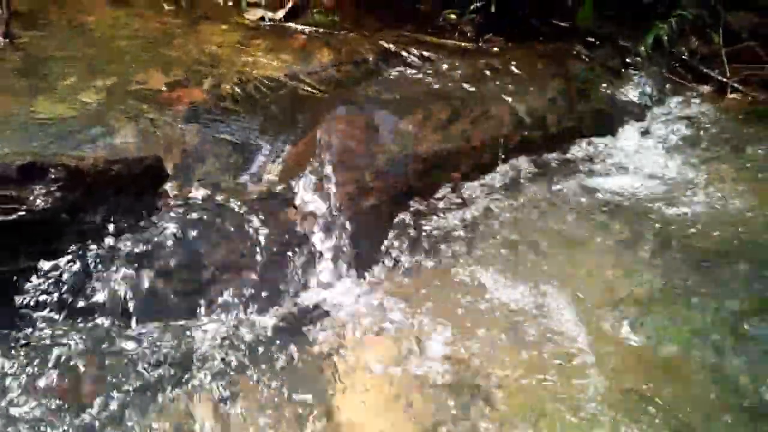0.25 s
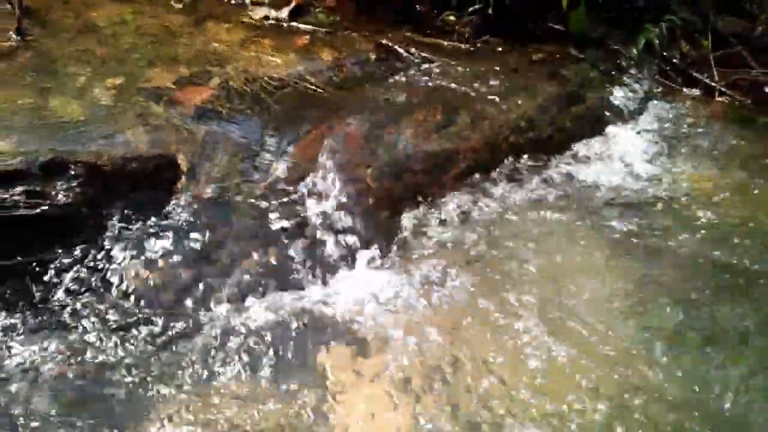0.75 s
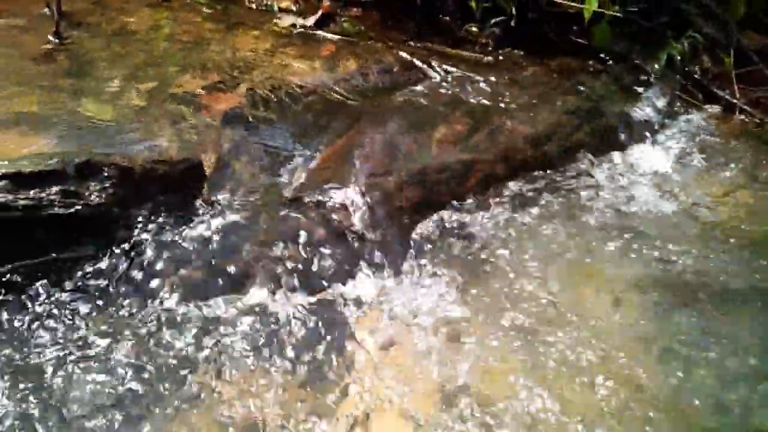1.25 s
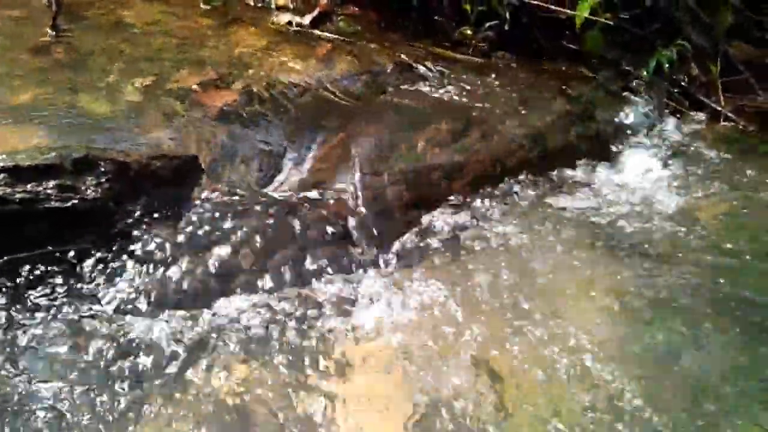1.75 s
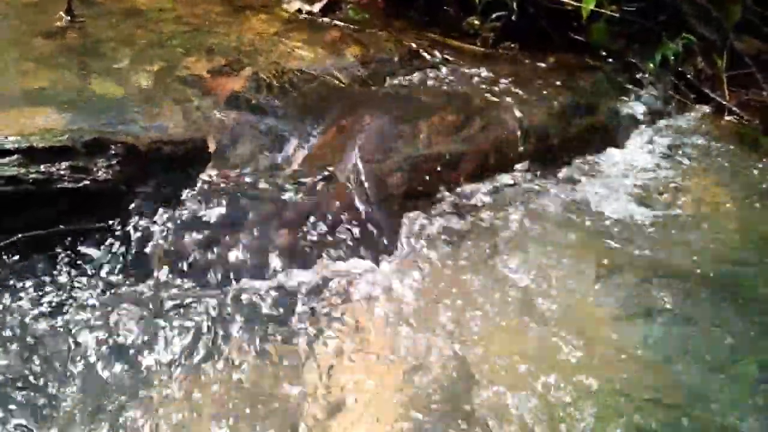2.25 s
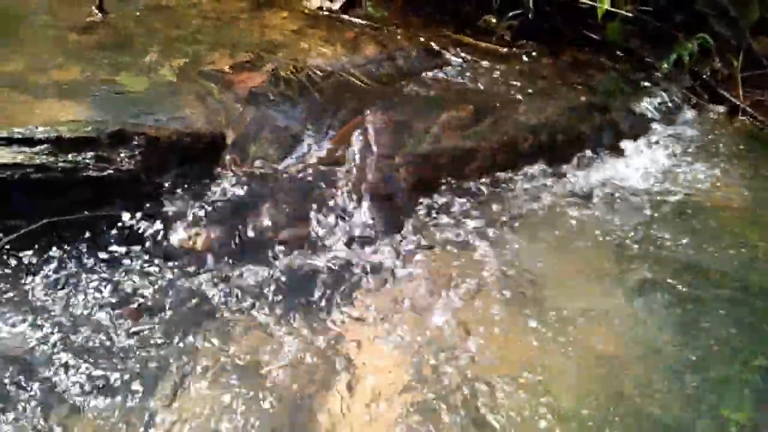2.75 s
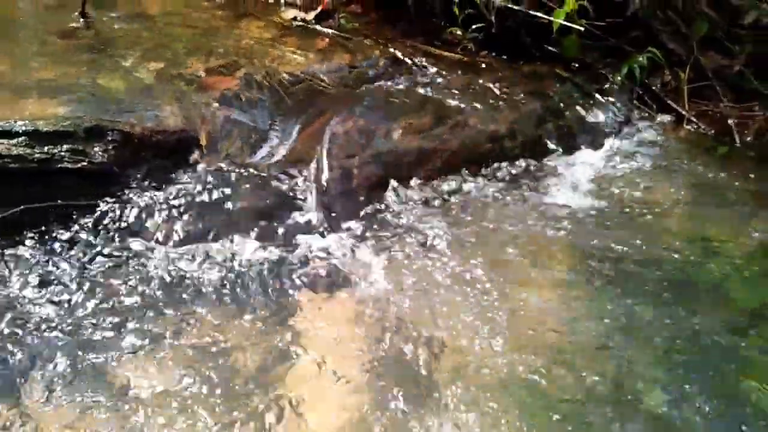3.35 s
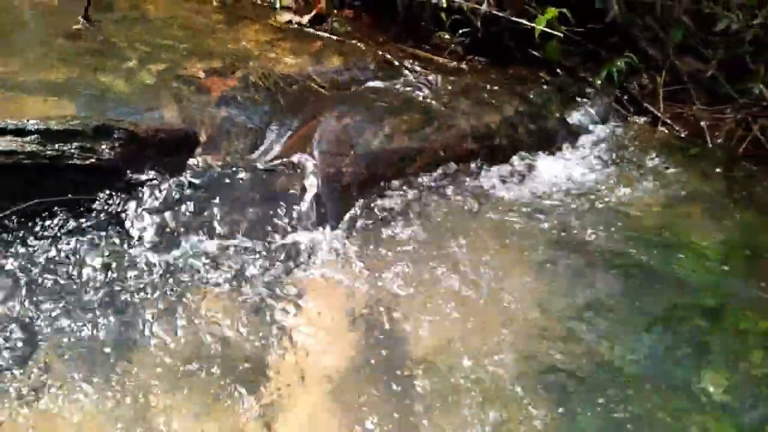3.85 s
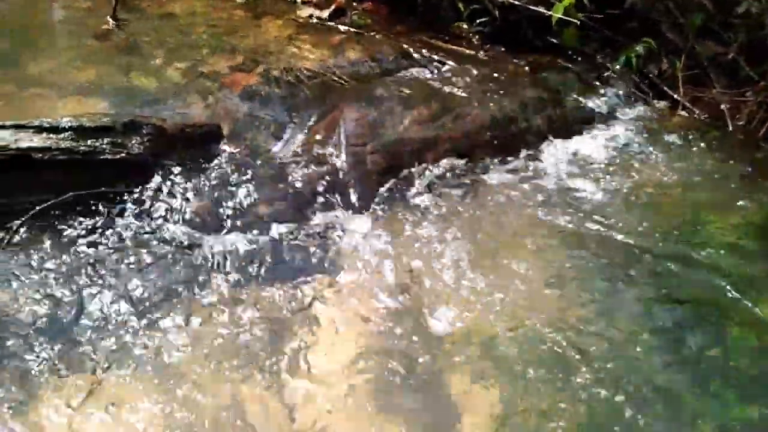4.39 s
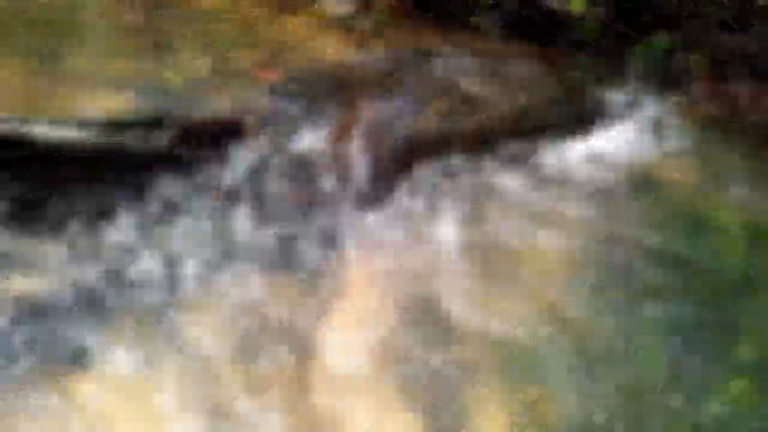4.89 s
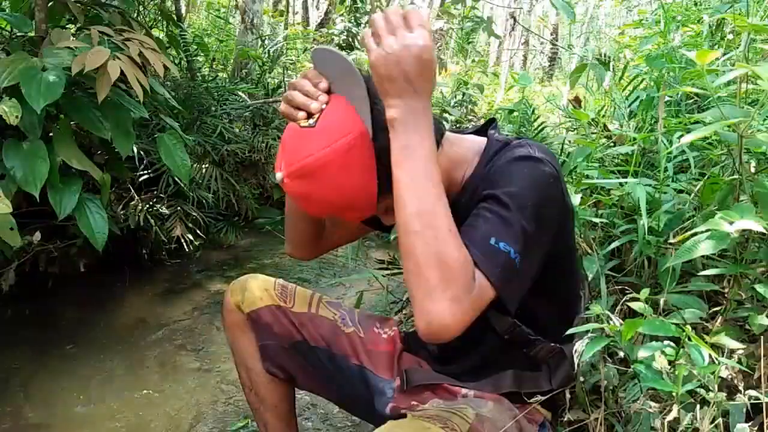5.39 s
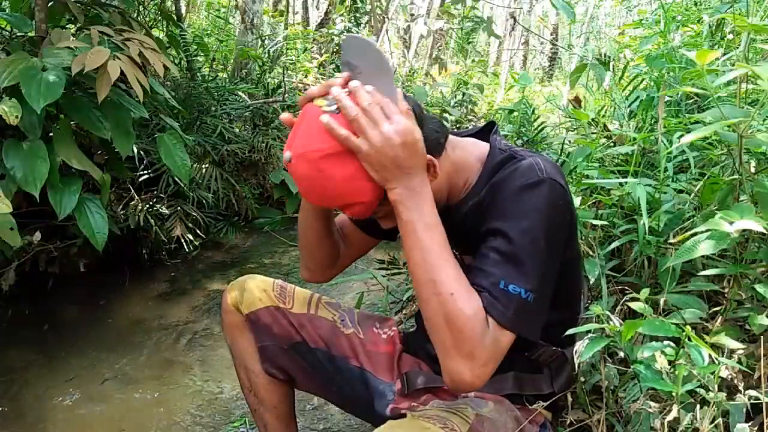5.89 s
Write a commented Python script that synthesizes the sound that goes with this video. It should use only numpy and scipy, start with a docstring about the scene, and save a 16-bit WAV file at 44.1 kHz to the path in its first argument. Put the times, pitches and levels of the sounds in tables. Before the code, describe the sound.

A small stream rushes and babbles loudly over a rock ledge, plopping and fizzing, then cuts abruptly to a quiet bank with thin shrilling insects.

```python
"""A rock ledge in a forest stream, heard close by on a hand-held microphone, then a quiet bank.
At the ledge, trapped air rings as plops and dense babble, a hollow below gurgles, foam fizzes,
spray patters and spits, and soft knocks reach the microphone's case; rocks return a short echo.
At the bank, insects shrill, slow water trickles and drips, wet hands rustle on a cap, birds whistle far off.
Bubbles, knocks and whistles are enveloped sines, other textures mostly shaped noise or bubble clouds."""
import sys
import numpy as np
from scipy import signal
from scipy.fft import rfft, irfft, next_fast_len
from scipy.io import wavfile
from scipy.ndimage import uniform_filter1d

SR = 44100
rng = np.random.default_rng(int(sys.argv[2]) if len(sys.argv) > 2 else 0)


def to_wav(sig):
    """Store sig (one row per channel, or 1-D mono) as 16-bit WAV at the path in sys.argv[1].

    Samples outside -1..1 are clipped; the rate is SR.
    """
    pcm = np.clip(np.atleast_2d(sig), -1, 1) * 32767
    pcm = np.round(pcm).astype(np.int16)
    wavfile.write(sys.argv[1], SR, pcm.T)  # frames by channels


N = 270333
TIME = np.arange(N) / SR   # [s]
SCENE_CHANGE_S = 4.584
CUTOFF_HZ = 14250

# Air dragged under by the fall; babble and gurgle each offset it: (time [s], level [dB])
CHURN_LEVEL = [(0, -47.5), (.3, -46.5), (1.0, -47), (1.4, -51.5), (1.7, -47), (1.9, -52), (2.05, -45),
               (2.22, -53), (2.45, -47.5), (3.0, -45), (3.55, -51.5), (3.7, -43.5), (3.82, -48),
               (4.55, -50)]
# Surges into the hollow under the ledge: (time [s], rms level at the top [dB], swell time [s])
HOLLOW_SURGES = [(.17, -56.5, 0.071), (.279, -50.5, 0.021), (0.523, -49, 0.022), (0.703, -51.5, 0.021),
                 (.81, -56.5, 0.026), (.89, -55.5, 0.033), (.965, -59, 0.026), (1.545, -57, 0.013),
                 (2.283, -56.5, .017), (2.36, -57.5, 0.034), (2.49, -58.5, 0.017), (2.68, -58, 0.026),
                 (2.825, -61, 0.012), (3.515, -61.5, 0.032), (3.68, -63.5, 0.071), (3.969, -60.5, 0.021),
                 (4.546, -60.5, 0.021)]
# Resonances of the air pockets under the ledge: (frequency [Hz], width [Hz], relative level [dB])
HOLLOW_RESONANCES = [(250.6, 33, -7.5), (298, 46, -4)]
# Small waves breaking into foam, before the fizz trim: (time [s], level at the top [dB])
BREAKERS = [(0.383, -55.5), (0.577, -53.5), (.738, -57.5), (1.055, -52), (1.226, -53), (1.478, -60),
            (1.77, -58), (2.37, -54.5), (2.512, -56.5), (2.81, -53.5), (3.2, -58.5), (3.59, -53.5),
            (4.17, -56.5)]
# Tongues of water slapping down: (time [s], rms level at the top [dB], swell time [s])
SPLASHES = [(.002, -53, 0.015), (.152, -56.5, 0.012), (.338, -57, 0.02), (0.467, -43.5, 0.012),
            (0.611, -51, 0.011), (1.066, -35.5, 0.0025), (1.553, -57, 0.0044), (1.784, -46.5, 0.0072),
            (1.962, -51, 0.0062), (2.172, -64, 0.019), (2.385, -68, .03), (2.825, -56, 0.012),
            (3.469, -54.5, 0.011), (3.646, -51, 0.0068), (3.695, -59, 0.019), (4.045, -61, .011),
            (4.205, -60.5, 0.013), (4.355, -54, 0.0052), (4.411, -56, 0.016)]
# Large air pockets pinching off: (time [s], pitch [Hz], peak level [dB], swell time [s])
PLOPS = [(.016, 790, -33, 0.0012), (.091, 672, -35, 0.0021), (.241, 1183, -31, 0.004),
         (0.264, 1205, -35, 0.0033), (.29, 700, -34.5, 0.0017), (0.315, 1065, -36.5, 0.0037),
         (0.412, 1990, -38.5, 0.0016), (.471, 1365, -33.5, 0.0018), (0.484, 1820, -35.5, 0.0031),
         (.558, 1890, -34, 0.0038), (0.622, 1250, -34, 0.0038), (0.631, 2130, -33.5, 0.0012),
         (0.713, 1345, -33.5, 0.0015), (0.806, 1294, -33, 0.0025), (.835, 1350, -37.5, 0.0056),
         (0.98, 1048, -37, 0.0063), (1.063, 1280, -42, 0.0027), (1.082, 940, -35.5, 0.0016),
         (1.125, 2100, -36, 0.0027), (1.26, 739, -31.5, 0.0074), (1.289, 1200, -39, 0.0044),
         (1.318, 1010, -33, 0.0018), (1.453, 1870, -40.5, 0.0038), (1.464, 883, -36, 0.0067),
         (1.493, 1403, -36.5, 0.0034), (1.635, 979, -36.5, 0.0052), (1.658, 675, -40.5, 0.0068),
         (1.691, 702, -34, 0.0025), (1.706, 930, -35.5, 0.0034), (1.784, 895, -30, 0.0023),
         (1.791, 2020, -30.5, 0.0015), (1.875, 1850, -37, 0.0027), (2.028, 840, -41.5, 0.004),
         (2.268, 1100, -36, 0.0043), (2.274, 1850, -33, 0.004), (2.292, 1550, -32.5, 0.0016),
         (2.472, 740, -35.5, 0.007), (2.543, 585, -33.5, 0.0084), (2.68, 1293, -40.5, 0.0046),
         (2.739, 1210, -40, 0.0022), (2.834, 1260, -24.5, 0.0024), (2.95, 1270, -34.5, 0.0012),
         (2.954, 597, -38.5, 0.006), (3.027, 2120, -35, 0.0018), (3.044, 1226, -33, 0.0051),
         (3.143, 1750, -37.5, 0.0024), (3.16, 1018, -37, 0.0043), (3.26, 673, -41, .005),
         (3.363, 1387, -35.5, 0.0039), (3.425, 1153, -36.5, 0.0026), (3.472, 1800, -38.5, 0.0025),
         (3.582, 1205, -37.5, 0.0036), (3.691, 1190, -34.5, 0.0076), (3.705, 780, -40.5, 0.0052),
         (3.853, 657, -43.5, 0.0079), (3.925, 1900, -38, 0.0021), (3.97, 1120, -36, 0.0019),
         (4.053, 1470, -37.5, 0.0025), (4.087, 1507, -41, 0.0066), (4.15, 730, -42, .004),
         (4.239, 1880, -34.5, 0.0016), (4.302, 1470, -37.5, 0.0041), (4.392, 916, -38, 0.0044),
         (4.416, 2610, -38, 0.0025), (4.487, 970, -34, 0.0039)]
# Soft knocks on the microphone's case: (time [s], peak level [dB])
KNOCKS = [(.028, -54), (.116, -55), (1.468, -60), (2.506, -50), (2.582, -53), (2.66, -53), (2.962, -52),
          (3.242, -53), (3.33, -54), (3.434, -54), (3.651, -55)]
# Crests flinging fine spray: (time [s], rms level at the top [dB])
SPRAYS = [(.165, -51), (.485, -47), (.938, -51), (1.28, -47), (1.512, -47), (3.022, -48), (3.09, -55),
          (3.216, -49)]
# Single droplets each ringing a tiny bubble: (time [s], pitch [Hz], peak level [dB])
PLINKS = [(0.526, 4200, -41), (0.836, 5200, -38), (1.065, 4300, -30), (1.216, 3200, -42.5),
          (1.233, 6420, -43), (1.939, 2630, -41), (2.188, 6373, -41.5), (3.603, 3010, -39)]
# Drops snapping on the surface: (time [s], pitch [Hz], peak level of the ring [dB])
SPITS = [(1.0673, 8950, -22), (1.2987, 9170, -33), (2.5558, 9300, -33), (2.576, 9300, -21),
         (2.8308, 8000, -24), (2.8429, 8750, -26), (3.6086, 7640, -26), (4.1549, 11100, -25),
         (4.1854, 8030, -28)]
# The insect chorus swelling and sinking: (time [s], level [dB])
INSECT_LEVEL = [(4.6, -58.5), (5.15, -60), (5.22, -62), (5.27, -58.5), (5.7, -63.5), (5.85, -60),
                (6.12, -62)]
# The slow water by the bank: (time [s], level [dB])
TRICKLE_LEVEL = [(4.6, -88), (4.85, -81), (5.25, -83), (5.6, -80.5)]
# Hands on the cap, before a shared lift: (time [s], level [dB], swell time [s])
RUSTLES = [(4.72, -86, 0.14), (4.86, -86, 0.008)]
# Water dripping into the pool: (time [s], pitch [Hz], peak level [dB], swell time [s])
DRIPS = [(4.868, 2290, -65, 0.0039), (4.973, 1730, -71, .004), (5.03, 2000, -71.5, .005),
         (5.9, 1010, -70, 0.0081), (5.985, 1900, -73, .005), (6.105, 890, -70, 0.01)]
# Birds far off: (time [s], pitch [Hz], peak level [dB], length [s])
WHISTLES = [(5.44, 1360, -79.5, 0.13), (5.567, 3410, -79, 0.029)]

# Colour of the babble: (frequency [Hz], relative level [dB])
BABBLE_COLOUR = [(375, -47.5), (425, -0.5), (470, -1.5), (515, -5.5), (585, 5.5), (660, -3), (745, 5),
                 (830, 0.5), (1150, 1), (1500, -3), (1900, -4), (2350, -12), (2750, -10), (3400, -18.5),
                 (7000, -40)]
# Colour of the foam fizz: (frequency [Hz], relative level [dB])
FIZZ_COLOUR = [(1800, -12), (3400, -30.5), (6300, -18), (6900, -11), (7400, -2.5), (7900, -2), (8500, -8.5),
               (9200, -9.5), (10500, -14), (14300, -18)]
# Colour of the insects' shrilling: (frequency [Hz], relative level [dB])
INSECT_COLOUR = [(6000, -56), (6600, -11), (7000, -3), (7300, 6), (7550, 7), (7900, 1), (8400, -8.5),
                 (9500, -16), (11000, -37), (14000, -25)]
# Colour of the forest background: (frequency [Hz], relative level [dB])
AIR_COLOUR = [(20, -6), (110, -4), (180, -13.5), (400, -12), (1000, -15), (5000, -21), (9000, -13),
              (12500, -22), (14300, -9.5)]
# Colours of the other textures: (frequency [Hz], relative level [dB])
SPLASH_COLOUR = [(2500, -0.5), (4200, 5.5), (6500, -1.0), (12000, -51)]
SPRAY_COLOUR = [(6000, -21), (9000, 4), (14000, -9)]
DROPLET_COLOUR = [(5800, -6.0), (7600, 37), (9300, 32.0), (14000, 20.0)]
TRICKLE_COLOUR = [(450, -10.0), (1000, -2.5), (2000, -10.5), (4000, -25.0)]
CLOTH_COLOUR = [(300, -15.0), (2000, 4.0), (5000, -4.5), (9000, 8), (14000, 4.0)]
# Left-right likeness of water and cloth: (frequency [Hz], likeness [0 to 1])
WATER_LIKENESS = [(6000, 1), (7500, 0.82), (9000, 0.5)]
# Left-right likeness of insects and background: (frequency [Hz], likeness [0 to 1])
BANK_LIKENESS = [(7500, 1), (14000, 0.38)]


def from_db(db):
    """Decibels to amplitude."""
    return 10 ** (np.asarray(db) / 20)


def rms_one(x):
    """Scale to rms 1."""
    return x / np.sqrt(np.mean(x ** 2) + 1e-20)


def in_time(rows):
    """A (time, level) curve read at every sample."""
    seconds, levels = np.transpose(rows)
    return np.interp(TIME, seconds, levels)


def at_hz(points, hz):
    """A spectrum read on a log-frequency axis."""
    frequencies, values = np.transpose(points)
    return np.interp(np.log(hz + 1), np.log(frequencies), values)


def filtered(x, gain):
    """Filter by a gain that is a function of frequency."""
    size = next_fast_len(N + 8192)   # padding keeps the end from wrapping onto the start
    hz = np.arange(size // 2 + 1) * SR / size
    return irfft(rfft(x, size) * gain(hz), size)[..., :N]


def coloured(x, spectrum):
    """Give a signal a spectrum and scale it to rms 1."""
    return rms_one(filtered(x, lambda hz: from_db(at_hz(spectrum, hz))))


def stereo(pair, likeness):
    """Two unrelated signals become left and right, as alike at each frequency as the table says."""
    def width(hz):
        alike = np.clip(at_hz(likeness, hz), 0, 1)
        return np.sqrt((1 - alike) / (1 + alike))
    middle, side = pair[0], filtered(pair[1], width)
    return middle + side * np.array([[1], [-1]])


def drift(rate_hz):
    """Random wandering with rms 1, mostly slower than the rate."""
    return rms_one(filtered(rng.standard_normal(N), lambda hz: 1 / (1 + (hz / rate_hz) ** 4)))


def add(track, when, sound):
    """Mix a sound into a track from a time [s] on."""
    start = int(np.clip(round(when * SR), 0, N))
    track[start:start + len(sound)] += sound[:N - start]


def swell(t, rise):
    """An envelope that rises to 1 after the rise time [s], then dies away."""
    age = np.maximum(t, 0) / rise
    return age ** 2 * np.exp(2 - 2 * age)


def evened(x, window_s):
    """Hold the slow level of a texture steady and keep its grain."""
    return x / np.sqrt(uniform_filter1d(x ** 2, int(window_s * SR)) + 1e-9)


def bubble(hz, rise, glide):
    """An air pocket pinches off and rings; its pitch climbs, where it glides, as it nears the surface."""
    t = np.arange(int(6 * rise * SR)) / SR
    pitch = hz * (1 + glide * (t / rise - 1))   # glide: fraction of the pitch per rise time
    cycles = np.cumsum(pitch) / SR + rng.random()
    return swell(t, rise) * np.sin(2 * np.pi * cycles)


def bubble_cloud(count, low_hz, high_hz, rise_s, spread_db):
    """Bubbles of all sizes at random times, few strong; small ones ring briefly and hardly glide."""
    out = np.zeros(N)
    for when, size, luck, damping, climb in rng.random((count, 5)):
        hz = low_hz * (high_hz / low_hz) ** size
        rise_spread = 2 ** (2 * damping - 1)
        rise = rise_s * (1000 / hz) ** (2 / 3) * rise_spread   # rise_s holds at 1 kHz
        strength = (hz / low_hz) ** (5 / 6) * from_db(-spread_db * np.log(luck + .03))
        add(out, when * N / SR, strength * bubble(hz, rise, glide=climb ** 2 * 25 / hz))
    return rms_one(out)


def ring_bubbles(rows, glide=0.0027):
    """Single bubbles, each with its own time, pitch, peak level and swell time."""
    out = np.zeros(N)
    for when, hz, db, rise in rows:
        add(out, when, from_db(db) * bubble(hz, rise, glide))
    return out


def among_rocks(x, echo_db=-9.5, t60_s=0.18):
    """The ledge and the banks scatter a short diffuse echo: decaying noise, silent for 3 ms."""
    t = TIME[:SR // 5]
    echo = rng.standard_normal(len(t)) * from_db(-60 * t / t60_s) * (t > .003)
    echo /= np.linalg.norm(echo)
    return x + from_db(echo_db) * signal.fftconvolve(x, echo)[:N]


def babble(clump_db=2.2, trim_db=-2.7, wash_db=-3.0):
    """Countless smaller bubbles come in clumps over the noisy wash of the fall."""
    cloud = bubble_cloud(count=5500, low_hz=400, high_hz=5200, rise_s=.0045, spread_db=3.5)
    wash = from_db(wash_db) * rng.standard_normal(N)
    clumps = from_db(clump_db * drift(20.7))
    water = coloured((cloud + wash) * clumps, BABBLE_COLOUR)
    low_cut = signal.butter(2, 240, "high", fs=SR, output="sos")
    water = signal.sosfilt(low_cut, water)
    return from_db(in_time(CHURN_LEVEL) + trim_db) * evened(water, 0.07)


def gurgle(idle_db=-29.0, lump_db=3.5):
    """Turbulence rings the air pockets under the ledge, gently with the churn, hardest in each surge."""
    idle = from_db(in_time(CHURN_LEVEL) + idle_db + lump_db * drift(18))   # idle_db: below the churn
    surges = sum(from_db(db) * swell(TIME - when, rise) for when, db, rise in HOLLOW_SURGES)

    def resonances(f):
        return sum(from_db(db) / (1 + 2 * ((f - hz) / width) ** 2) ** (3 / 2)
                   for hz, width, db in HOLLOW_RESONANCES)
    rings = rms_one(filtered(rng.standard_normal(N), resonances))
    return (idle + surges) * evened(rings, 0.038)


def foam_level(idle_db=-54.5, swell_s=0.051):
    """Every breaker lifts the fizz above its idle level; the foam then dies away."""
    return from_db(idle_db) + sum(from_db(db) * swell(TIME - when, swell_s) for when, db in BREAKERS)


def flutter(count, rise, depth):
    """Ripples at random times: each quickly lifts the fizz and lets it sink back."""
    breaks = np.zeros(N)
    breaks[rng.integers(0, N, count)] = rng.exponential(1, count)
    lift = signal.fftconvolve(breaks, swell(TIME[:SR // 10], rise))[:N]
    return rms_one(1 + depth * rms_one(lift))


def fizz(hiss_db=8.5, trim_db=3.0, ripple_depth=.4):
    """Tiny foam bubbles ping over a smooth hiss; each size of bubble comes in ripples of its own."""
    pings = np.array([bubble_cloud(count=7000, low_hz=2500, high_hz=14000, rise_s=.004, spread_db=3.5)
                      for side in range(2)])
    foam = pings + from_db(hiss_db) * rng.standard_normal((2, N))   # hiss relative to the pings
    rippled = np.zeros((2, N))
    for centre in 2400 * np.sqrt(2) ** np.arange(7):   # overlapping bands, half an octave apart [Hz]
        band = filtered(foam, lambda hz: np.maximum(0, 1 - 2 * abs(np.log2((hz + 1) / centre))))
        rippled += band * flutter(count=170, rise=.005, depth=ripple_depth)
    level = from_db(trim_db) * foam_level()
    return stereo(level * coloured(rippled, FIZZ_COLOUR), WATER_LIKENESS)


def splashes(idle_db=-71.0, clump_db=3.5):
    """Falling water tears into ragged bursts of small bubbles; weaker ones come and go between them."""
    idle = from_db(idle_db + clump_db * drift(23))
    slaps = sum(from_db(db) * swell(TIME - when, rise) for when, db, rise in SPLASHES)
    shreds = bubble_cloud(count=5000, low_hz=2500, high_hz=12000, rise_s=.0025, spread_db=3)
    return (idle + slaps) * evened(coloured(shreds, SPLASH_COLOUR), 0.02)


def open_air(level_db):
    """The faint even background of the forest, as coloured noise."""
    return from_db(level_db) * stereo(coloured(rng.standard_normal((2, N)), AIR_COLOUR), BANK_LIKENESS)


def plops():
    """Large air pockets pinch off under the fall and ring."""
    return ring_bubbles(PLOPS)


def shed_bubbles(count=7, lead_s=0.002, within_s=.034, loss_db=11.0, octaves=0.47, swell_s=0.0033):
    """Each large pocket comes amid weaker bubbles near its own pitch, crowded towards its start."""
    out = np.zeros(N)
    for when, hz, db, rise in PLOPS:
        for delay, size, luck in rng.random((count, 3)):
            pitch = hz * 2 ** (octaves * (2 * size - 1))
            # pockets that swell briefly shed weaker bubbles
            strength = from_db(db - loss_db) * (.5 + luck) * np.sqrt(rise / (rise + swell_s))
            add(out, when - lead_s + within_s * delay ** 2, strength * bubble(pitch, swell_s, glide=0))
    return out


def knocks(start_hz=115, end_hz=48, sag_s=0.016, rise_s=0.012):
    """Dull thumps of a few cycles on the microphone's case, whose pitch sags as they fade."""
    out, t = np.zeros(N), TIME[:SR // 10]
    pitch = end_hz + (start_hz - end_hz) * np.exp(-t / sag_s)
    thump = swell(t, rise_s) * np.sin(2 * np.pi * np.cumsum(pitch) / SR)
    for when, db in KNOCKS:
        add(out, when, from_db(db) * thump)
    return out


def sprays(swell_s=0.01, grain_db=0.0):
    """Fine bright spray patters back onto the water, as short swells of noise."""
    thrown = sum(from_db(db) * swell(TIME - when, swell_s) for when, db in SPRAYS)
    grain = from_db(grain_db * drift(400))   # at 0 dB the mist stays smooth
    mist = coloured(rng.standard_normal((2, N)) * grain, SPRAY_COLOUR)
    return thrown * stereo(mist, WATER_LIKENESS)


def plinks(rise_s=.0018):
    """Stray droplets fall back one by one and ring small bubbles."""
    return ring_bubbles([(when, hz, db, rise_s) for when, hz, db in PLINKS])


def spits(scatter_s=0.0019, scatter_db=-11):
    """A drop snaps with a very brief high ring and scatters finer droplets, heard as a noise burst."""
    snaps, scatter = np.zeros(N), np.zeros(N)
    for when, hz, db in SPITS:
        add(snaps, when, from_db(db) * bubble(hz, rise=.00028, glide=0))
        add(scatter, when, from_db(db + scatter_db) * swell(TIME[:SR // 20], scatter_s))
    droplets = coloured(rng.standard_normal((2, N)), DROPLET_COLOUR)
    return snaps + scatter * stereo(droplets, WATER_LIKENESS)


def insects(flutter_db=1.5):
    """A chorus in the bushes: noise in a narrow shrill band with a fast flutter."""
    fluttering = rng.standard_normal((2, N)) * from_db(flutter_db * drift(40))
    chorus = coloured(fluttering, INSECT_COLOUR)
    return from_db(in_time(INSECT_LEVEL)) * stereo(chorus, BANK_LIKENESS)


def trickle():
    """Faint bubbles ring in the slow water by the bank."""
    cloud = bubble_cloud(count=5000, low_hz=456, high_hz=4200, rise_s=0.004, spread_db=2.0)
    return from_db(in_time(TRICKLE_LEVEL)) * coloured(cloud, TRICKLE_COLOUR)


def rustles(grain_db=2.5, lift_db=19.0):
    """Wet fingers brush over the cloth of a cap: grainy noise that swells with each touch."""
    touch = sum(from_db(db + lift_db) * swell(TIME - when, rise) for when, db, rise in RUSTLES)
    grain = from_db(grain_db * drift(300))
    cloth = coloured(rng.standard_normal((2, N)) * grain, CLOTH_COLOUR)
    return touch * stereo(cloth, WATER_LIKENESS)


def drips():
    """Water drips into the pool, each drop ringing one bubble."""
    return ring_bubbles(DRIPS)


def birds():
    """Thin level whistles far off: steady sines with rounded ends."""
    out = np.zeros(N)
    for when, hz, db, length in WHISTLES:
        t = TIME[:int(length * SR)]
        envelope = np.sqrt(np.hanning(len(t)))
        add(out, when, from_db(db) * envelope * np.sin(2 * np.pi * hz * t))
    return out


def scene(bank_air_db=-72.0, ledge_lift_db=3.5):
    """The rushing ledge, where the background is fuller, then the quiet bank."""
    echoing = among_rocks(babble() + splashes() + plops() + shed_bubbles() + plinks())
    ledge = echoing + gurgle() + fizz() + knocks() + sprays() + spits()
    bank = insects() + trickle() + rustles() + drips() + birds()
    air = open_air(bank_air_db)
    return np.where(TIME < SCENE_CHANGE_S, ledge + from_db(ledge_lift_db) * air, bank + air)


def record(dry):
    """The treble is cut steeply above the cutoff."""
    return filtered(dry, lambda hz: 1 / np.sqrt(1 + (hz / CUTOFF_HZ) ** 300))


dry = scene()
out = record(dry)
to_wav(out)
```